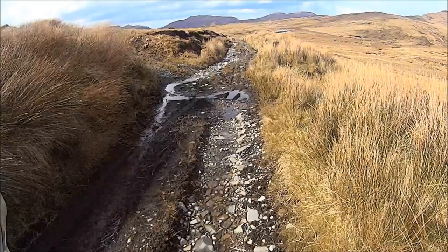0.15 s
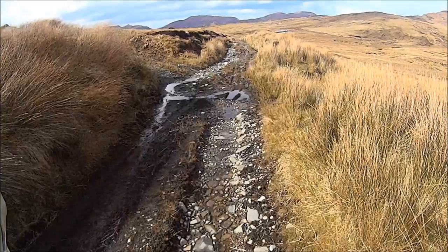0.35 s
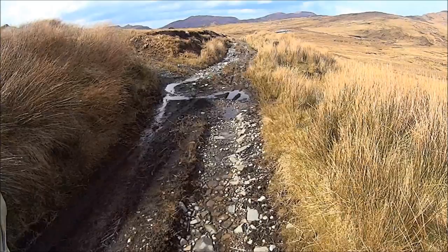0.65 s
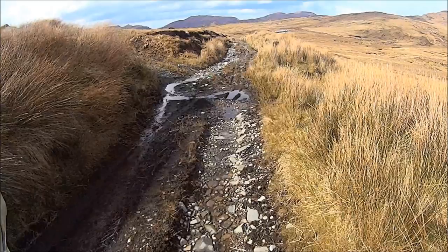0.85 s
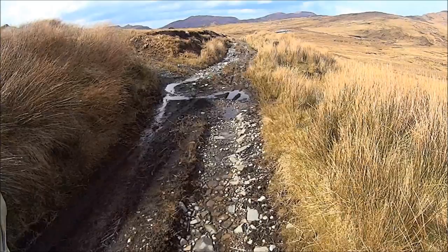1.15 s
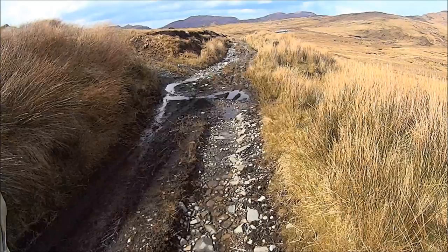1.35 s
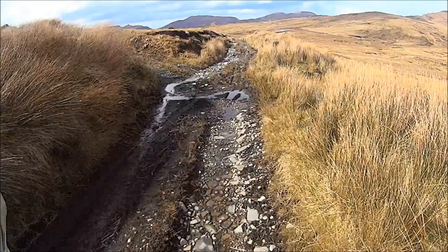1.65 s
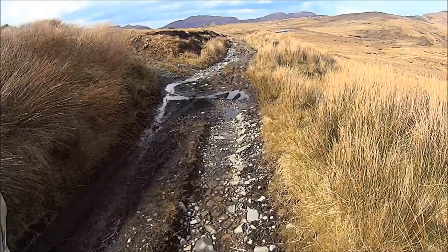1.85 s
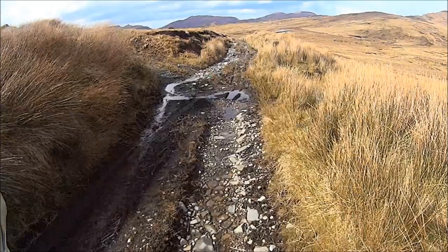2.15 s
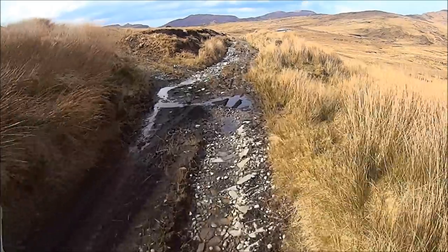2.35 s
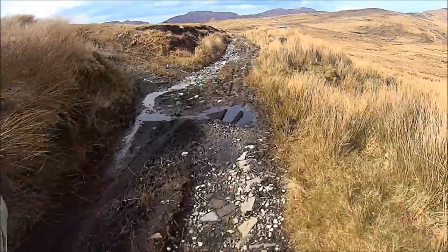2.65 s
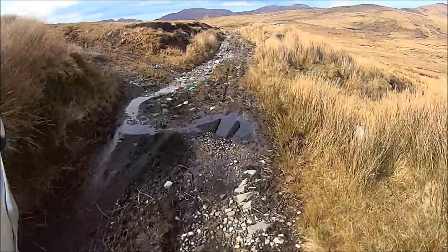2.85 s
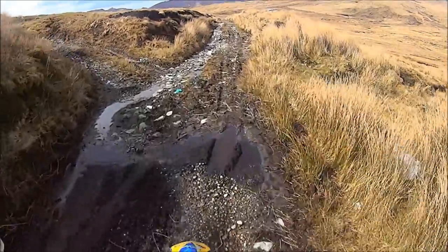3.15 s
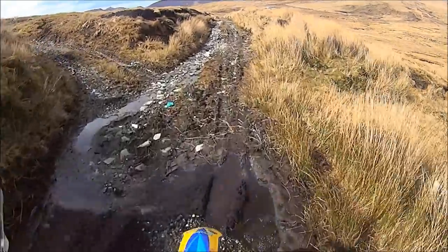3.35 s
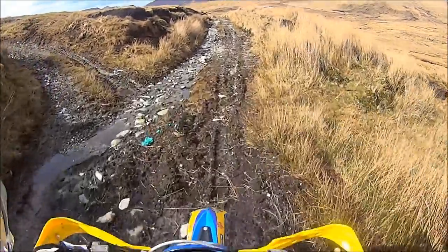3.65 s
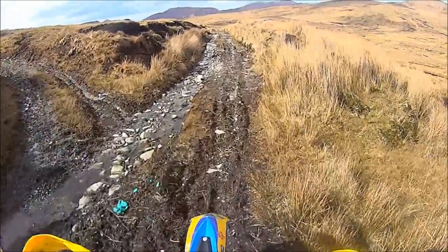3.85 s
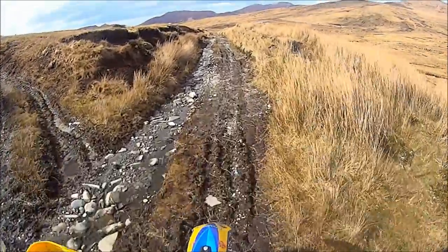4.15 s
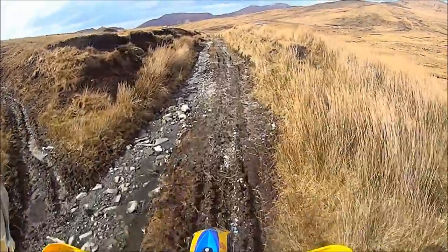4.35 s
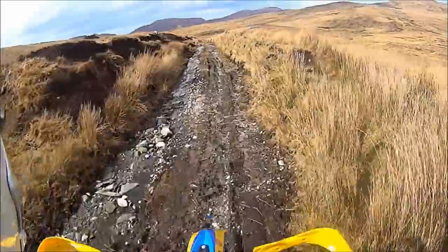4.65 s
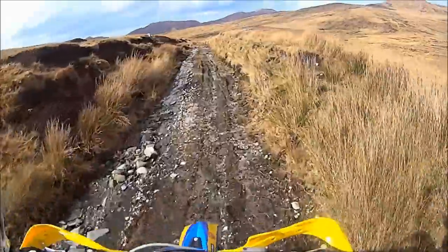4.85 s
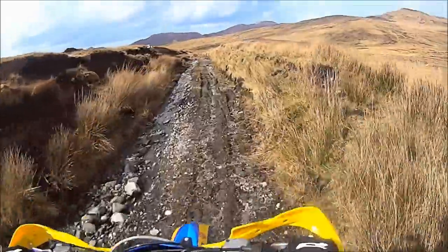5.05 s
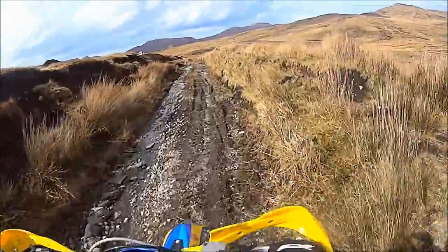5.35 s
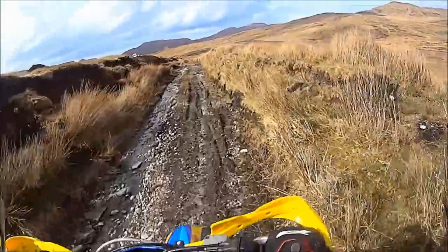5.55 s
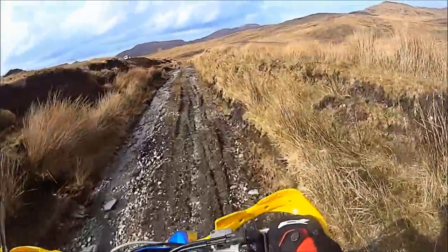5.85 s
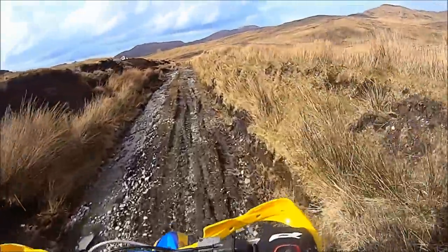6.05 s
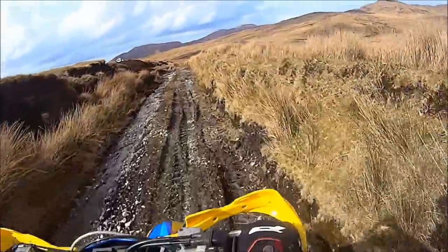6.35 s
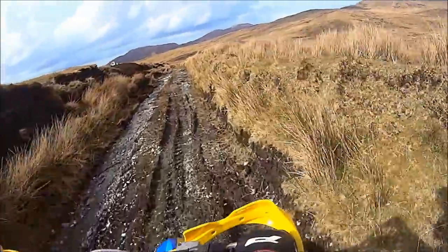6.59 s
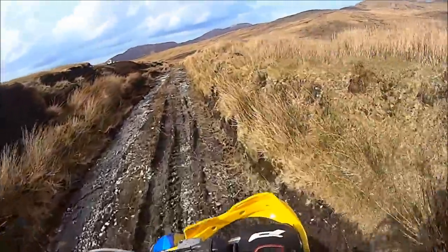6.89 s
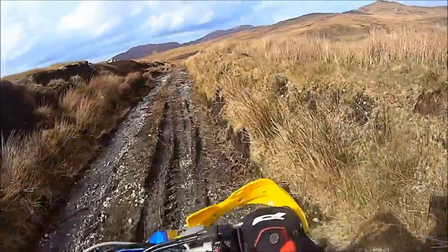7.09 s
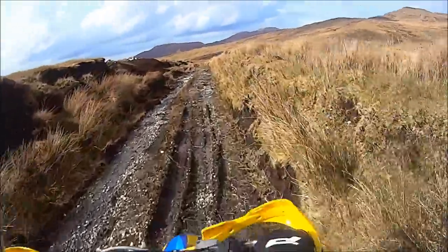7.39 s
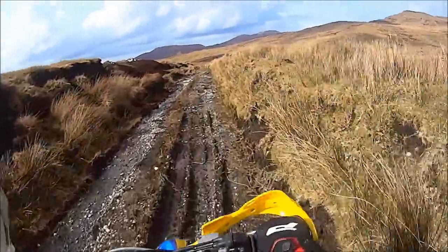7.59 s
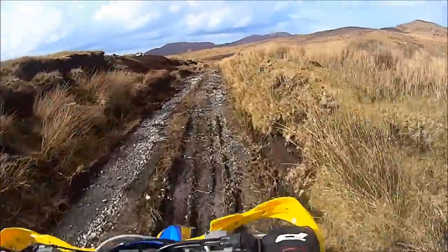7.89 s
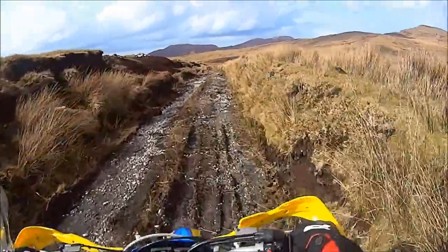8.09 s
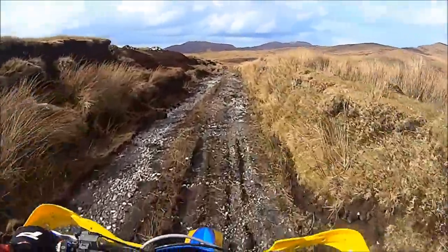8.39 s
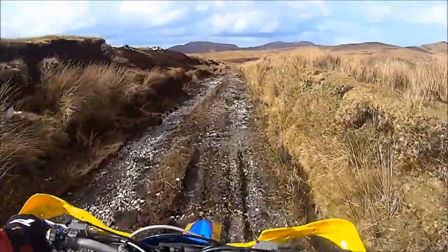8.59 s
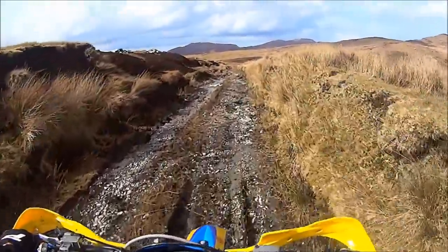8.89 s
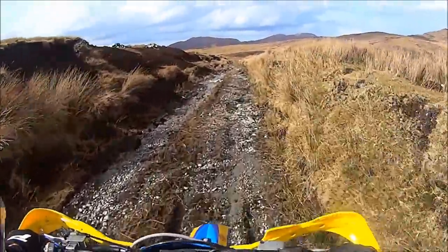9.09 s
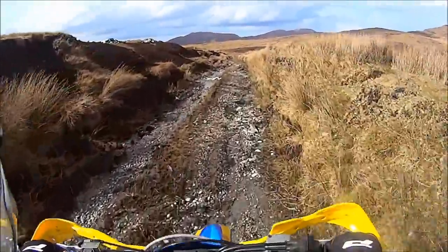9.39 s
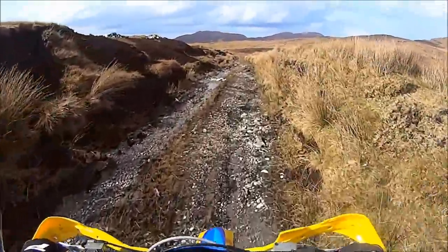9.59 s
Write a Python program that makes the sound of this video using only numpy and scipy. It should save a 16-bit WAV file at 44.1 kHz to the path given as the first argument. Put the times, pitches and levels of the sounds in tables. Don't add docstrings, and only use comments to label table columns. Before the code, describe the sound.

A single-cylinder dirt motorcycle crawls over a stony track on open moorland, heard close in stereo from the rider's position inside a closed, resonant camera housing. From 0 to 1.2 s the exhaust thumps low and hollow at roughly twenty pulses a second, quickening briefly around 1 s, with dense metallic rattle and bright stone clacks. The throttle eases from 1.3 to 2.4 s, leaving clatter and knocks. From 2.5 to 4.8 s it pulls steadily, grit spraying and hard slaps crowding around 3 to 4 s. From 5 s it drops off; heavy, dull jolts stand out over slower, softer popping near fifteen pulses a second, especially around 6.9 and 7.3 s. A short pull with grit comes at 7.6 to 8.1 s, then slow chugging and scattered bumps to 9.7 s. Lumpy wind rumble and tyre roar lie beneath; treble gradually thins.

```python
import sys
import numpy as np
from scipy import signal
from scipy.fft import rfft, irfft, next_fast_len
from scipy.io import wavfile
from scipy.ndimage import uniform_filter1d

SR = 44100
rng = np.random.default_rng(int(sys.argv[2]) if len(sys.argv) > 2 else 0)


def transcribe(signal):
    frames = np.atleast_2d(signal).T
    limited = np.clip(frames, -1, 1)
    pcm = np.round(limited * 32767).astype(np.int16)
    wavfile.write(sys.argv[1], SR, pcm)


def how_loud(loudness_db):
    steps = np.asarray(loudness_db, float) / 20
    return 10 ** steps


N = 429093
T = np.arange(N) / SR
LONG = next_fast_len(N)
HZ = np.fft.rfftfreq(LONG, 1 / SR)

# time in seconds, peak of the exhaust thump in dB.
THROTTLE = [(0, -20), (.25, -23), (.65, -20.5), (1.05, -22), (1.25, -31), (2.2, -43), (2.47, -26),
            (3.0, -22.5), (4.75, -23.5), (5.3, -38), (6.0, -40), (6.22, -29), (7.45, -29.5), (7.7, -22.5),
            (8.0, -23), (8.15, -33), (8.65, -30), (9.73, -32)]
TICKS = [.15, .67, .82, 1.31, 1.9, 1.95, 2.0, 2.71, 3.0, 3.8, 3.96, 4.47, 4.53, 5.21, 5.55, 6.17, 7.52,
         8.04, 8.87]


def cycles():
    # time in seconds, firings per second.
    engine_speed = [(0, 21.42), (.32, 18.95), (1.08, 26.44), (1.4, 19.49), (2.35, 19.78), (2.85, 20.53),
                    (4.01, 22.65), (4.17, 20.22), (4.75, 20.97), (4.86, 20.04), (6.19, 15.95), (6.8, 16.52),
                    (7.43, 14.67), (7.59, 17.26), (9.33, 14.75), (9.73, 14.77)]
    first_turn = -.2
    return first_turn + np.cumsum(along(engine_speed)[0]) / SR


def slack():
    return np.clip((-24 - along(THROTTLE)[0]) / 5, 0, 1)


def exhaust(turns):
    # frequency in Hz, width in Hz, level in dB.
    pipe_modes = [(271, 45.7, 0.5), (297.5, 68, -5.5), (232.6, 76, -6.5), (353, 49, -8.5), (555, 26, -18.5),
                  (116.4, 44, -13.5)]
    puff_hz, puff_at_s, puff_s, puff_db = 280, .015, .0042, 2.2
    echo_s, echo_db = .017, -8
    idle = slack()
    firings = np.flatnonzero(np.diff(np.floor(turns + .2)) > 0)
    luck = rng.standard_normal((len(firings), 3))
    jitter = (.00012 * SR * luck[:, 0]).astype(int)
    at = np.clip(firings + jitter, 0, N - 1)
    pulse_db = along(THROTTLE)[0][at] + (.8 + 1.4 * idle[at]) * luck[:, 1]
    train = np.zeros((2, N))
    train[:, at] = how_loud(pulse_db) * np.array([np.ones(len(at)), .4 * luck[:, 2]])

    t = T[:4000]
    thump = np.zeros(len(t))
    for hz, width, db in pipe_modes:
        decay = np.pi * width * t
        thump += how_loud(db) * np.e * decay * np.exp(-decay) * np.sin(2 * np.pi * hz * t)
    puff = np.exp(-.5 * ((t - puff_at_s) / puff_s) ** 2) * np.sin(2 * np.pi * puff_hz * t)
    puff = how_loud(puff_db) * (puff + how_loud(echo_db) * np.roll(puff, round(echo_s * SR)))
    pulling = signal.oaconvolve(train * (1 - idle), thump[None])
    idling = signal.oaconvolve(train * idle, puff[None])
    return ports(*(pulling + idling)[:, :N])


def clatter(turns):
    # time in seconds, rattle in dB, treble lift by grit under the tyres in dB.
    rattle = [(0, -19, -2), (.3, -21.5, -1.5), (.9, -18.5, -0.5), (1.5, -21, -1.5), (2.1, -20, -4.5),
              (2.6, -19.5, -3), (3.0, -20, -0.5), (3.5, -20, 1), (4.1, -21.5, 0), (4.3, -22.5, 0),
              (5.0, -21.5, -3), (5.6, -24, -2), (6.5, -27, 0), (7.3, -25, -2.5), (7.9, -22.5, -4.5),
              (8.25, -26, -0.5), (8.5, -24.5, -2.5), (9.73, -26, -3)]
    # middle in seconds, length in seconds, lift in dB.
    sprays = [(.95, 0.2, 1), (1.81, 0.066, 3), (2.785, 0.046, 0), (3.305, 0.054, 1.5), (3.54, 0.083, 3.5),
              (3.828, 0.086, 2), (4.042, .06, 1.5), (4.797, .05, 1.5), (7.564, 0.035, 4.5), (7.683, .06, 3),
              (7.876, 0.21, 3), (8.74, .05, 1.5), (9.656, .08, 2.5)]
    # time in seconds, peak in dB.
    hard_strokes = [(0.034, -11), (0.13, -8), (0.2339, -24), (0.2823, -12), (0.3875, -11.5), (0.4848, -12),
                    (0.5246, -9), (0.5841, -11), (0.7544, -9.5), (0.841, -10), (0.921, -9), (1.0041, -10),
                    (1.039, -12), (1.079, -9.5), (1.1378, -8), (1.1992, -10), (1.2436, -11), (1.3094, -17),
                    (1.4117, -18), (1.607, -12.5), (1.6621, -21), (1.7964, -8.5), (1.8502, -12),
                    (1.8966, -17), (2.0398, -14), (2.0966, -21), (2.1854, -9), (2.4324, -18),
                    (2.5012, -17), (2.5506, -23), (2.611, -10), (2.8015, -18), (2.8539, -9),
                    (2.9038, -8.5), (2.9412, -8.5), (2.9871, -9), (3.1901, -19), (3.237, -14),
                    (3.2854, -10), (3.325, -12), (3.3732, -10.5), (3.5578, -12), (3.7479, -14),
                    (3.7913, -7.5), (3.8703, -6.5), (3.9165, -10), (4.0043, -17), (4.0602, -11),
                    (4.105, -8), (4.199, -9.5), (4.3864, -15), (4.444, -10),
                    (4.4863, -13.5), (4.5427, -16), (4.59, -12), (4.7287, -19), (4.831, -12.5),
                    (4.9023, -15), (5.1189, -16), (5.278, -14), (5.6786, -23), (5.8821, -13), (5.935, -17),
                    (5.9739, -16), (6.201, -11), (6.2832, -17), (6.406, -18), (6.486, -18), (6.542, -14),
                    (6.8779, -18), (7.1707, -14), (7.2116, -18), (7.4984, -28), (7.6606, -18),
                    (7.7206, -13), (7.7788, -21), (7.8282, -17), (7.8916, -15), (7.9459, -18), (7.983, -16),
                    (8.0397, -12), (8.5386, -25), (8.579, -17), (8.6364, -15), (8.7082, -17), (8.7611, -17),
                    (9.0255, -14), (9.0878, -14.5), (9.2584, -17), (9.3597, -14), (9.3991, -12.5),
                    (9.5638, -14.5)]
    # frequency in Hz, width in Hz, left in dB, right in dB.
    body_modes = [(1054, 176, -8, -13.5), (1281, 173, -4.5, -5.5), (1559, 126, -5, -1.5),
                  (1740, 307, 3.5, 0.5), (2058, 40, -38, 0.5)]
    ring_modes = [(2307, 204, -4.5, -4.5), (2590, 600, 0, -5), (2938, 420, -4.5, -6.5)]
    fizz_modes = [(3525, 720, 0.78, -3), (4100, 1050, -0.86, -29), (4453, 240, -1.2, -3),
                  (5090, 706, -1.6, -0.5)]
    hiss_modes = [(5990, 760, 2, 3.5), (6980, 1700, 2, 1.5), (8880, 2700, -1.5, -2), (9800, 3800, -6.5, -8)]
    air_modes = [(12200, 3100, -1, -1), (14100, 3300, 0, 0)]
    layer_db = [-3, -4, -14, -26]
    grit_share = [0, .5, .8, 1.1]
    stroke_db = [-7.5, -12, -25.5, -38.5, -68]
    rise_s, fall_s = .0025, .007
    air_start_db, air_fall_db_per_s = -62, 1

    rattle_db, grit_db = along(rattle)
    grit_db = grit_db + near(*np.transpose(sprays))
    t = T[:2000]
    slap = (1 - np.exp(-t / rise_s)) * np.exp(-t / fall_s) * 2
    slaps = struck(hard_strokes, slap)
    levels_db = [rattle_db + db + share * grit_db for db, share in zip(layer_db, grit_share)]
    air_db = air_start_db - air_fall_db_per_s * T
    levels_db.append(air_db + 8 * near(TICKS, .016) + .8 * chance(10)[0])

    turns = turns + (.02 + .08 * slack()) * chance(7)[0]
    burst = np.exp(4.5 * (np.cos(2 * np.pi * (turns - .71)) - 1))
    idle_stroke = np.exp(3 * (np.cos(2 * np.pi * (turns - .1)) - 1))
    strength = 1 + .2 * np.tanh(chance(12)[0])
    shared_db = (5 * burst + 2 * idle_stroke) * strength + .3 * chance(45)[0]
    layers = body_modes, ring_modes, fizz_modes, hiss_modes, air_modes
    depths = .85, 1, 1.05, .45, .2
    flickers = chance(29, channels=5)
    out = np.zeros((2, N))
    for modes, db, slap_db, depth, flicker in zip(layers, levels_db, stroke_db, depths, flickers):
        hz, width, *side_db = np.transpose(modes)[:, :, None]
        peaks = 1 / (1 + (2 * (HZ - hz) / width) ** 2) ** 2
        gain = np.sqrt([(how_loud(2 * side) * peaks).sum(0) for side in side_db])
        throb = evened(how_loud(depth * shared_db + .4 * flicker))
        envelope = np.hypot(throb * how_loud(db + .37), slaps * how_loud(slap_db))
        out += ports(*(envelope * rng.standard_normal((2, N))), evened(gain))
    return out


def jolts():
    # time in seconds, peak in dB, boom and crack in dB relative to the peak.
    jolt_rows = [(0.011, -12.5, -9, -14.5), (0.042, -7.5, -11, -20), (0.149, -7, -12.5, -22),
                 (0.364, -6.5, -12.5, -15.5), (0.454, -9, -11, -16), (0.533, -11.5, -10.5, -14),
                 (0.775, -6.5, -15, -16.5), (1.054, -10.5, -9.5, -18), (1.312, -8.5, -11.5, -15),
                 (1.44, -10.5, -15, -14), (1.495, -9, -8.5, -17.5), (1.663, -5.5, -13, -16.5),
                 (2.714, -9.5, -10.5, -15.5), (2.802, -9, -13.5, -20), (3.034, -9.5, -6, -18),
                 (3.23, -7.5, -15.5, -18), (3.473, -10.5, -6.5, -15), (3.583, -8.5, -20.5, -18.5),
                 (3.637, -10.5, -25, -10.5), (3.67, -17, -17, -13), (3.82, -9.5, -19.5, -16),
                 (3.943, -11, -25, -11.5), (4.064, -14, -9.5, -13), (4.094, -13.5, -8.5, -20),
                 (4.611, -7, -14, -18.5), (4.727, -10, -12, -20), (4.857, -4, -14.5, -17.5),
                      (4.908, -6.5, -19, -14), (4.979, -7.5, -15, -25), (5.026, -7, -12, -22),
                      (5.059, -15.5, -9.5, -14), (5.146, -12.5, -11, -19), (5.2, -8, -11.5, -22),
                      (5.362, -7.5, -15, -19), (5.459, -10, -11, -22), (6.138, -7.5, -14, -17),
                      (6.655, -7, -13, -15), (6.716, -12, -8.5, -19), (6.914, -5, -18, -19),
                      (7.095, -9, -10, -18.5), (7.135, -17, -9, -15), (7.158, -15.5, -12, -16),
                      (7.3, -3.5, -16.5, -23), (7.327, -18, -4, -24),
                 (7.479, -7.5, -13.5, -22), (7.572, -10.5, -6.5, -17.5), (7.673, -7.5, -12, -20),
                    (7.696, -22, -13, -23), (7.766, -8.5, -10.5, -19), (7.855, -11.5, -16.5, -9.5),
                    (7.916, -9, -20, -11.5), (8.003, -8, -12.5, -19), (8.038, -11.5, -7.5, -23),
                    (8.168, -23.5, -3.5, -26), (8.3, -10.5, -8.5, -19.5), (8.337, -20, -12, -19),
                    (8.354, -16, -10, -23), (8.376, -17, -9, -12), (8.398, -16, -17, -12.5),
                    (8.552, -8, -11.5, -15), (8.611, -11.5, -22, -9), (8.85, -6.5, -14.5, -20.5),
                    (9.401, -12, -10, -8.5), (9.473, -26, -11, -26.5)]
    # frequency in Hz, 60 dB decay in seconds, start phase in radians, level in dB.
    mount_modes = [(127.4, 0.13, 0.013, -10.5), (153.8, 0.09, 0.0025, -3.5), (315, 0.029, 0.038, 6.5),
                   (414.4, 0.06, 0, -9), (545, 0.065, 0.015, 2.5), (750, 0.054, 0.013, -3),
                   (1038, 0.026, 0, 3), (1390, 0.019, 0.0084, 5.5)]
    mode_group = [0, 0, 1, 1, 2, 2, 2, 2]
    boom_gain_db, knock_db, crack_gain_db, push_db = 5, -7.5, .5, -3
    front_hz, front_s, front_db = 1290, .00071, -3.5
    lag_s = .0009

    rows = jolt_rows
    luck = rng.random((len(rows), 16))
    out, t = np.zeros((2, N + 9000)), T[:4000]
    sweep = 330 * t + 4.2 * (1 - np.exp(-t / .0024))
    push = (t / .0028) ** 1.3 * np.exp(1.3 - 1.3 * t / .0028) * np.cos(2 * np.pi * sweep)
    front = t / front_s * np.exp(1 - t / front_s) * np.sin(2 * np.pi * front_hz * t)
    rise = (1 - np.exp(-t / .0013)) ** 2
    other = np.array([[1], [1.12]])
    for (s, db, boom_db, crack_db), u in zip(rows, luck):
        group_db = boom_db + boom_gain_db, knock_db, crack_db + crack_gain_db
        blow = np.array([push + how_loud(front_db) * front, np.roll(push, 40)])
        knock = how_loud(.5 * crack_db + push_db) * blow
        for (hz, t60, phase, gain_db), group, v in zip(mount_modes, mode_group, u):
            envelope = how_loud(group_db[group] + gain_db + 7 - 60 * t / t60) * rise
            angle = 2 * np.pi * hz * (.954 + .18 * v) * other * t
            knock += envelope * np.sin(angle + phase + 3.64 * v * other ** 8)
        bounce_s, bounce_size = .00453 + .03 * u[8:11], .4 * (2 * u[11:14] - 1)
        for late, size in zip(bounce_s, bounce_size):
            shift = round(late * SR)
            knock[:, shift:] += size * how_loud(-330 * late) * knock[:, :len(t) - shift]
        at = round((s + lag_s) * SR)
        out[:, at:at + len(t)] += how_loud(db) * np.sign(u[15] - .5) * knock
    high_pass = 1 / (1 + (85 / (HZ + 1)) ** 6)
    return ports(*out[:, :N], high_pass) * how_loud([[.1], [-.1]])


def clacks():
    # time in seconds, peak in dB, pitch in Hz.
    clack_rows = [(0.5876, -28, 4840), (0.631, -27, 4900), (0.7592, -27, 4900), (0.9253, -24, 5000),
                  (1.0425, -28, 5040), (1.3723, -23, 4750), (3.0929, -27, 4900), (3.7888, -28, 5000),
                  (3.8671, -27, 4900), (8.1868, -31, 4700), (0.1865, -26.5, 4700), (0.2389, -29, 5030),
                  (0.8016, -16, 4540), (0.8849, -23, 5200), (0.9647, -22, 4880), (1.0924, -17, 4960),
                  (1.8188, -19, 4420), (2.8559, -28, 4700), (3.021, -23, 4380), (3.1901, -29, 4940),
                  (4.153, -24, 4350), (4.5416, -21, 4570), (5.4291, -24, 4050), (8.0416, -30.5, 5300)]
    out, t = np.zeros(N + 2000), T[:2000]
    for (s, db, hz), u in zip(clack_rows, rng.random((len(clack_rows), 14))):
        ring = sum(np.sin(2 * np.pi * hz * (.8 + .4 * v) * t + 70 * v) for v in u)
        envelope = how_loud(db - 13 - 60 * t / .05) * np.minimum(t / .002, 1)
        out[round(s * SR):][:len(t)] += envelope * ring
    return ports(out[:N], np.roll(out[:N], 9))


def snaps():
    # time in seconds, peak in dB.
    snap_rows = [(0.1555, -29), (1.3134, -41), (1.493, -51), (1.8901, -43), (2.6509, -46), (2.7122, -48),
                 (3.0006, -41), (3.7838, -43), (3.9709, -42), (4.1131, -44), (4.4583, -46), (4.5106, -49),
                 (4.6473, -65), (5.2071, -52), (5.3642, -55), (5.7623, -67), (5.9494, -63), (6.1779, -47),
                 (6.5989, -60), (6.6593, -56), (7.0863, -62), (8.0376, -45), (8.5694, -57), (8.8508, -48)]
    t = T[:60] - T[30]
    click = struck(snap_rows, np.exp(-(t / .00015) ** 2) * np.sin(2 * np.pi * 13800 * t))
    return np.array([click, .8 * click])


def wind():
    # time in seconds, rumble in dB.
    gusts = [(0.0, -40), (0.6, -56), (1.0, -40.5), (2.38, -54.5), (3.17, -50), (3.39, -61), (3.52, -45.5),
             (4.28, -60), (4.99, -45), (6.59, -58), (6.67, -48), (6.8, -57), (7.89, -50), (9.73, -54.5)]
    # frequency in Hz, density in dB per Hz.
    rumble_colour = [(15, -5), (30, -1), (60, -3), (100, -12), (160, -15), (300, -6.5)]
    roar_colour = [(100, -3.5), (170, -15), (290, -6), (400, -8), (540, -4), (680, -13.5), (760, -6),
                   (850, -11), (1100, -1), (2000, -23.5)]
    roar_db = -26.5
    noise = rng.standard_normal((5, N))
    rumble = shaped(1.05 * noise[:1] + noise[1:3], colour(rumble_colour))
    rumble = evened(rumble * how_loud(1.5 * chance(6, channels=2)))
    roar = evened(ports(*noise[3:], colour(roar_colour)) * how_loud(1.5 * chance(15)))
    return rumble * how_loud(along(gusts)[0] + 8.5) + roar * how_loud(roar_db + .27 * along(THROTTLE)[0])


def ports(a, b, gain=1):
    # frequency in Hz, lead of the left in radians, likeness from 0 to 1.
    port_pair = [(70, 0, .5), (150, 0, .93), (250, -1.1, .9), (400, -1.5, .8), (550, -1.9, .8),
                 (700, -2.3, .75), (1000, -2, .93), (1500, -.8, .96), (1950, -.6, .97), (2200, 1, .9),
                 (2900, 1.5, .95), (3100, 1.1, .75), (3400, 3, .55), (3700, 5.7, .5), (4700, 6.1, .6),
                 (5100, 6.1, .88), (6000, 6, .5), (10000, 6.2, .5), (12000, 6.28, .55)]
    f, lead, same = np.transpose(port_pair)
    lead = np.interp(HZ, f, lead)
    same = np.clip(np.interp(HZ, f, same), 0, 1)
    left = rfft(a, LONG)
    right = same * left + np.sqrt(1 - same ** 2) * rfft(b, LONG)
    turn = np.exp(.5j * np.outer([1, -1], lead))
    return irfft(gain * turn * np.array([left, right]), LONG)[:, :N]


def evened(x):
    return x / np.sqrt(np.mean(x ** 2) + 1e-20)


def along(rows):
    s, *columns = np.transpose(rows)
    return [np.interp(T, s, c) for c in columns]


def shaped(x, gain):
    return irfft(rfft(x, LONG) * gain, LONG)[..., :N]


def colour(points):
    f, db = np.transpose(points)
    return how_loud(np.interp(np.log(HZ + 1), np.log(f), db, left=-90, right=-90))


def chance(hz, channels=1):
    count = N // 32 + 2
    low_pass = 1 / (1 + (np.fft.rfftfreq(count, 32 / SR) / hz) ** 2)
    slow = irfft(rfft(rng.standard_normal((channels, count))) * low_pass, count)
    return evened(np.array([np.interp(T, np.arange(count) * 32 / SR, row) for row in slow]))


def near(s, length, height=1):
    s, length, height = [np.reshape(v, (-1, 1)) for v in (s, length, height)]
    bumps = np.exp(-(2 * (T[::64] - s) / length) ** 4)
    return (height * bumps).max(0).repeat(64)[:N]


def struck(rows, shape):
    s, db = np.transpose(rows)
    train = np.zeros(N)
    train[(s * SR).astype(int)] = how_loud(db)
    return signal.oaconvolve(train, shape)[:N]


def scene():
    turns = cycles()
    return exhaust(turns) + clatter(turns) + clacks() + snaps() + jolts() + wind()


def band_limit(x):
    return signal.sosfilt(signal.butter(12, 15930, fs=SR, output="sos"), x)


def record(dry):
    # time in seconds, frequency in Hz.
    ridge = [(0.0, 1730), (0.08, 1660), (0.3, 1746), (4.88, 1670), (5.53, 1760), (6.2, 1650), (6.61, 1790),
             (6.72, 1630), (6.77, 1800), (6.91, 1660), (7.02, 1760), (8.64, 1680), (8.7, 1820),
             (9.24, 1740), (9.32, 1790), (9.4, 1660), (9.65, 1850), (9.73, 1710)]
    # frequency in Hz, share of the loss.
    starved = [(11000, 0), (11150, .8), (11700, 1), (12300, 0), (15150, 0), (15300, 1), (15700, 2),
               (15900, 12)]
    # middle in seconds, length in seconds.
    lulls = [(5.26, .07), (5.73, .08), (5.93, .05), (6.55, .11), (7.05, .08), (7.34, .14), (8.12, .1),
             (8.35, .09), (8.75, .12), (8.83, .05), (9.34, .08), (9.43, .05), (7.77, .06), (4.62, .04)]
    ridge_db, ridge_width_hz = 3, 79
    hz, t, z = signal.stft(dry, SR, nperseg=2048)

    def lean(centre_hz, width_hz, db):
        return np.outer(np.exp(-((hz - centre_hz) / width_hz) ** 2), db)

    def at_frames(x):
        return np.interp(t, T, x)

    drift = uniform_filter1d(rng.standard_normal(z.shape[1:]), size=7, axis=0)
    drift = evened(uniform_filter1d(drift, size=14, axis=1))
    lean_db = lean(1050, 130, np.interp(t, [4.8, 5.6], [0, -3.5]))
    lean_db += lean(1710, 90, np.interp(t, [4.1, 4.6], [.3, -2.6]))
    lean_db += lean(1930, 130, np.interp(t, [4.6, 5.6], [-1.2, 2.2]))
    lean_db += lean(2620, 150, 7.7 * np.exp(-((t - 2.6) / .051) ** 2))
    lean_db += lean(1640, 60, np.interp(t, [4.3, 5.6], [0, -2.5]))
    ridge_hz = np.interp(t, *np.transpose(ridge))
    lean_db += ridge_db * np.exp(-((hz[:, None] - ridge_hz) / ridge_width_hz) ** 2)
    middle = ((hz > 900) & (hz < 5500))[:, None]
    z = z * how_loud(1.5 * drift * middle + lean_db)

    loss_db = -2 + 4 * at_frames(chance(9)[0]) - 3 * t
    loss_db -= 20 * at_frames(near([1.0, 1.75, 2.48], [.2, .2, .14]))
    loss_db += 40 * at_frames(near(TICKS, .03))
    z = z * how_loud(np.outer(np.interp(hz, *np.transpose(starved)), np.clip(loss_db, -40, -3)))

    cell = uniform_filter1d(abs(z).mean(0), size=5, axis=0)
    usual = uniform_filter1d(uniform_filter1d(cell, size=81, axis=0), size=41, axis=1)
    bar_db = np.interp(hz, [4000, 5500, 8000, 11000, 12200], [-60, -9, -3, -1, -.8])[:, None]
    bar_db = bar_db + np.outer(hz > 11100, .3 * t)
    z = z * how_loud(np.outer(hz > 11100, -50 * at_frames(near(*np.transpose(lulls)))))
    z = z * np.where(cell < usual * how_loud(bar_db), .01, 1)
    kept = signal.istft(z, SR, nperseg=2048)[1][:, :N]
    fade_in = np.minimum(T / .00092, 1)
    return band_limit(np.clip(kept * fade_in, -1, 1))


dry = scene()
out = record(dry)
transcribe(out)
```